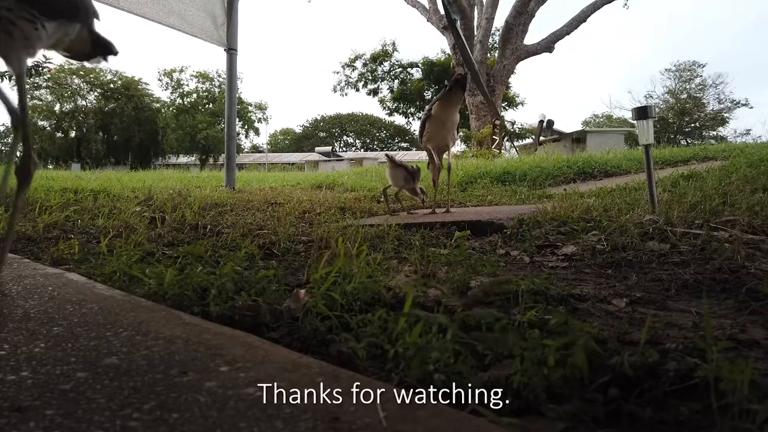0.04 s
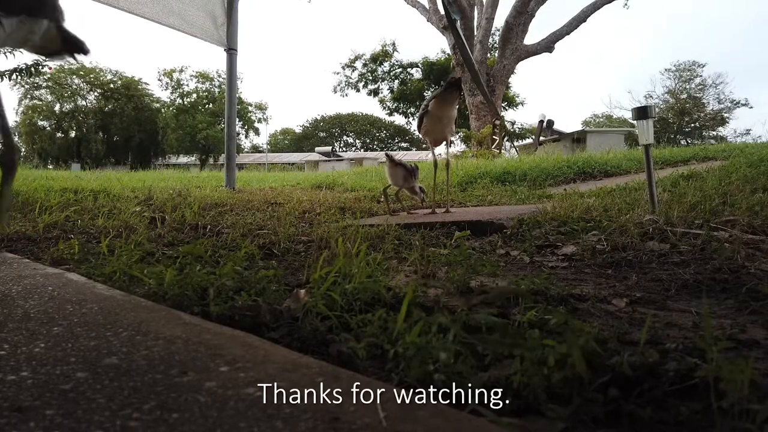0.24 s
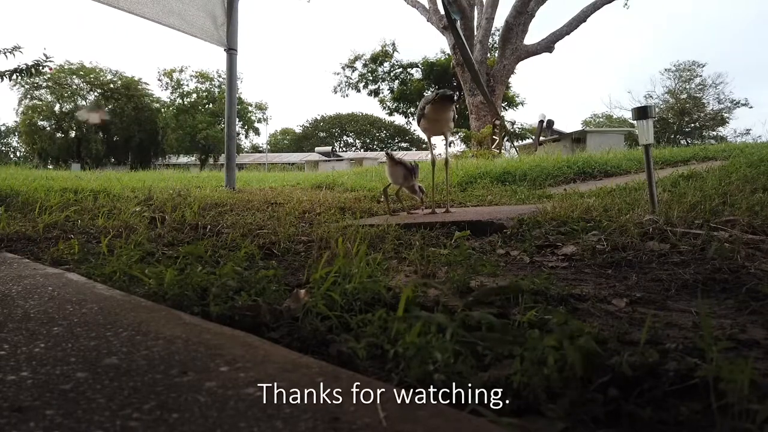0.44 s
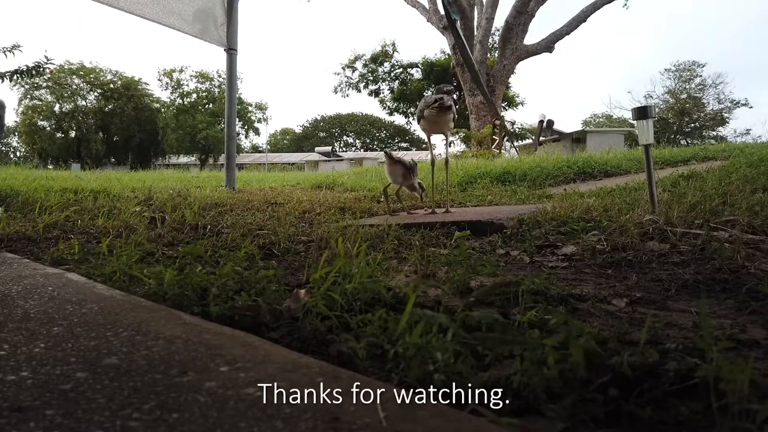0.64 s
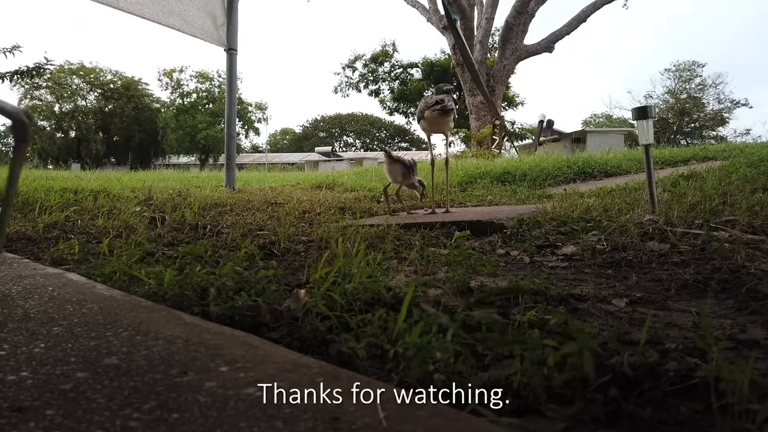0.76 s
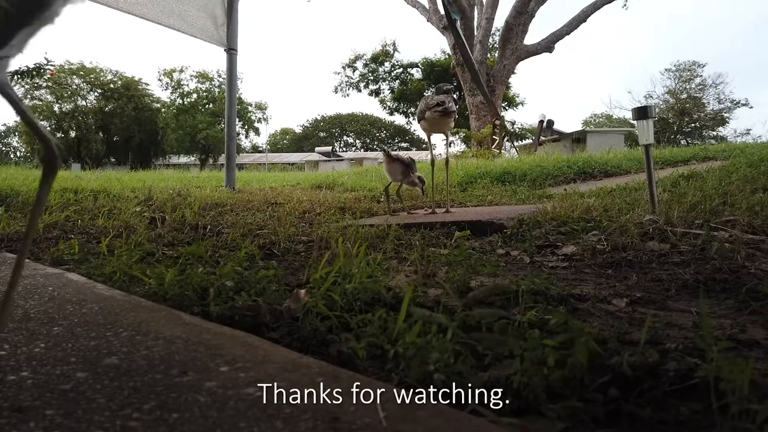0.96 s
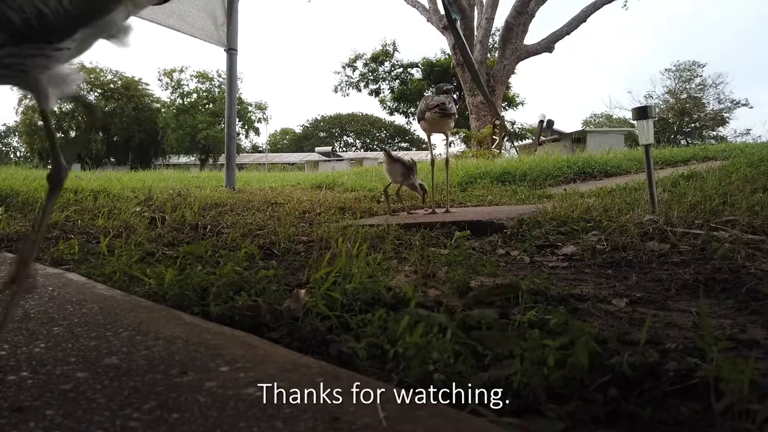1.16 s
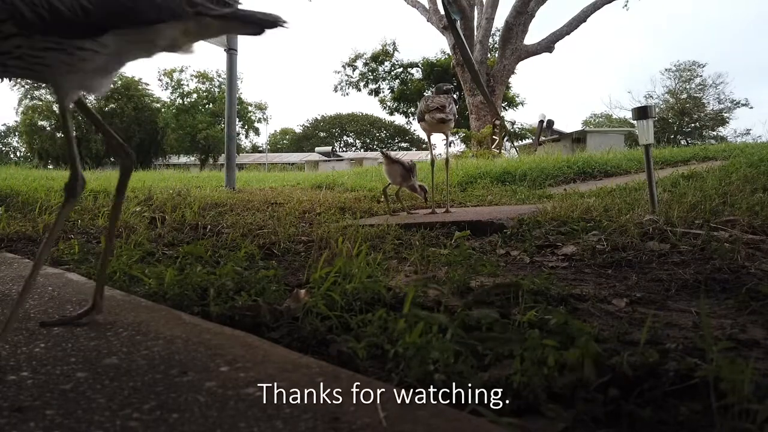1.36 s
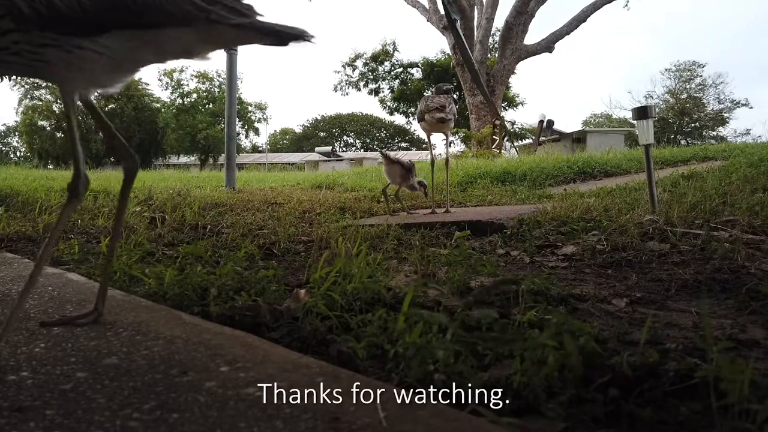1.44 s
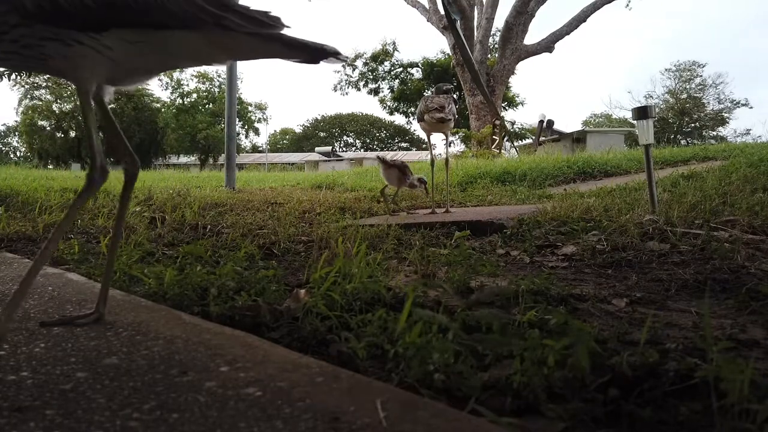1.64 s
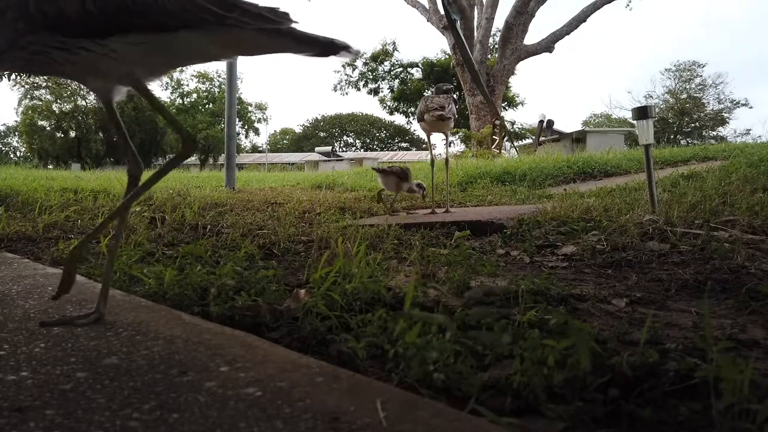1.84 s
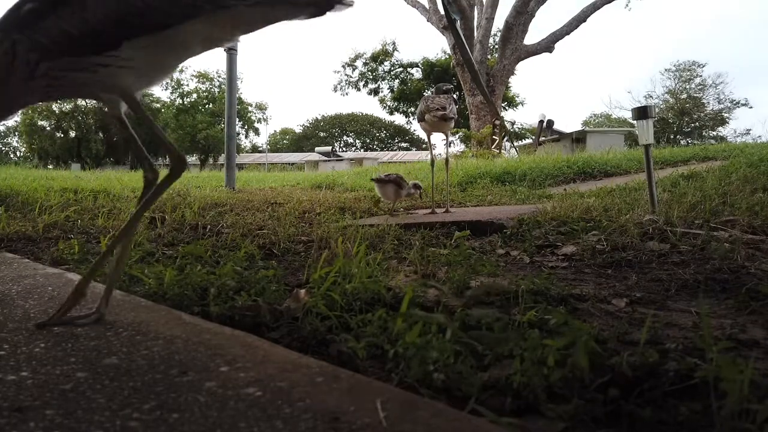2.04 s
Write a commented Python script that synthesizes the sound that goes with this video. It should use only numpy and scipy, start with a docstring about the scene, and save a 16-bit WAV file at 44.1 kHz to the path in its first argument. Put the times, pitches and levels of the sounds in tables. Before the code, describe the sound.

A large ground bird calls close by on an open lawn. A breathy hiss with a thin squeal dies away by 0.15 s; a rough croak clears into a short whistle at 0.3-0.43. Breeze rumble, soft microphone thumps, faint insects and distant whistles fill the gap. At 1.37 a chirp frays into a hiss, then a stuttering, harsh rasp from 1.65 peaks near 1.94 and fades, lightly echoing.

```python
"""Bush stone-curlews call close by on an open lawn. First a hiss of puffed air dies away, then a rough
croak clears into a whistle made of overtones. Later a chirp, a moving tone that grows unsteady, opens
a second hiss. Last comes a long rasp: uneven puffs with ringing voiced strands, after a stuttering start.
Throughout, noise makes the air and breeze, and a narrow noise band the faint insects; low swings
thump at the microphone and pure notes whistle far off. Trees and houses answer with delayed copies."""
import sys
import numpy as np
from scipy import signal
from scipy.fft import rfft, irfft, next_fast_len
from scipy.io import wavfile
from scipy.ndimage import map_coordinates

SR = 44100
rng = np.random.default_rng(int(sys.argv[2]) if len(sys.argv) > 2 else 0)


def wav_out(sig):
    """Save sig, one row per channel (or a flat mono array), as 16-bit PCM at SR to the path in sys.argv[1]."""
    wavfile.write(sys.argv[1], SR, np.round(np.clip(np.atleast_2d(sig).T, -1, 1) * 32767).astype(np.int16))


N = 92036  # length in samples


def amp(db):
    """Turns decibels into a gain."""
    return 10 ** (np.asarray(db) / 20)


def unit(x):
    """Scales a sound to an average (rms) strength of 1."""
    return x / np.sqrt(np.mean(x ** 2) + 1e-20)


def along(points, hz):
    """Reads a table of (pitch_hz, value) between its points, on a log pitch axis."""
    f, v = np.transpose(points)
    return np.interp(np.log(hz + 1), np.log(f + 1), v)


def curves(rows):
    """Gives one smooth-running curve for each table column after the time."""
    s, *cols = np.transpose(rows)
    return [np.interp(np.arange(N) / SR, s, c) for c in cols]


def during(rows):
    """True from the first row's time to the last row's."""
    t = np.arange(N) / SR
    return (t >= rows[0][0]) & (t <= rows[-1][0])


def wobble(rate):
    """A smooth random curve through so many random points a second."""
    return map_coordinates(rng.standard_normal(N // 8), [np.arange(N) * rate / SR], mode="wrap")


def filtered(x, response):
    """Reshapes a sound by a gain that depends on frequency."""
    m = next_fast_len(N + SR // 2)
    gain = response(np.fft.rfftfreq(m, 1 / SR))
    return irfft(rfft(x, m) * gain, m)[..., :N]


def spread(pair, alike):
    """Mixes two unrelated sounds into left and right with a given likeness, at rms 1."""
    def turn(hz):
        return np.arccos(np.clip(along(alike, hz), -1, 1)) / 2
    mid, side = filtered(pair, lambda hz: np.array([np.cos(turn(hz)), np.sin(turn(hz))]))
    return unit(np.array([mid + side, mid - side]))


def rush(colour, alike, gate=1):
    """Rushing air: stereo noise, shaped in time by the gate and then coloured."""
    noise = gate * rng.standard_normal((2, N))
    coloured = filtered(noise, lambda hz: amp(along(colour, hz)))
    return spread(coloured, alike)


def resonance(f, hz, width):
    """The response of something that rings at one pitch."""
    return 1j * f * width / (hz * hz - f * f + 1j * f * width)


def tone(hz, overtones):
    """Sine waves at whole multiples of a moving pitch."""
    phase = 2 * np.pi * np.cumsum(hz) / SR
    return np.sqrt(2) * sum(amp(db) * np.sin(round(k) * phase) for k, db in overtones)


# colour of the outdoor air: pitch_hz, relative_level_db
AIR_COLOUR = [(60, -36), (250, 1.5), (500, -5), (1000, -8), (2000, -14), (3200, -14), (5000, -21),
              (9500, -22), (11500, -28.5), (15000, -37)]
# how alike the air is at left and right: pitch_hz, likeness (1 = same)
AIR_LIKENESS = [(60, 0.23), (400, 1), (1650, 0.94), (4970, 0.65), (15000, 0.32)]
# the insects' loudness: time_s, level_db
INSECT_LEVELS = [(.45, -70), (.8, -64.5), (1.05, -76)]
AIR_DB, INSECT_HZ = -57, 10150


def surroundings():
    """Steady noise for the outdoor air and a thin, ringing noise band for insects."""
    db, = curves(INSECT_LEVELS)
    noise = rng.standard_normal((2, N))
    shrill = unit(filtered(noise, lambda f: resonance(f, INSECT_HZ, 1000) ** 2))
    air = amp(AIR_DB) * rush(AIR_COLOUR, AIR_LIKENESS)
    return air + amp(db + 1.3 * wobble(25.0)) * shrill


# how alike the low rumbles are at left and right: pitch_hz, likeness (1 = same)
BASS_LIKENESS = [(30, 0.22), (400, 0.54)]
# the breeze's loudness: time_s, level_db
BREEZE_LEVELS = [(0, -34.5), (.12, -36.5), (.3, -42.5), (.42, -44), (.59, -39), (.68, -48), (.85, -37),
                 (1.26, -38), (1.35, -44.5), (1.49, -43), (1.58, -36.5), (1.85, -44), (2.08, -36)]
# colour of the breeze: pitch_hz, relative_level_db
BREEZE_COLOUR = [(14, -8), (28, 3.5), (50, -1.5), (110, -5), (180, -14), (420, -34), (900, -58)]


def breeze(lumpy_db=2.5):
    """Moving air buffets the two microphone ports as lumpy, low noise."""
    db, = curves(BREEZE_LEVELS)
    lumps = amp(lumpy_db * wobble(30.31))
    return amp(db) * unit(lumps * rush(BREEZE_COLOUR, BASS_LIKENESS))


# soft thumps at the microphone: start_s, level_db, pitch_hz, decay_s
THUMPS = [(0.028, -31.5, 134.5, 0.042), (0.219, -28, 138.9, 0.042), (0.356, -21, 32.5, 0.029),
          (.485, -30.5, 184.7, 0.023), (0.585, -34.5, 129, 0.0083), (0.836, -23, 236, 0.015),
          (1.051, -31, 152.7, 0.018), (1.165, -37, 179.5, 0.1), (1.25, -30.5, 240, 0.023),
          (1.625, -29, 149, 0.02), (1.65, -28, 205.8, 0.023), (1.676, -35.5, 176, 0.028)]
# colour of their scuff: pitch_hz, relative_level_db
SCUFF_COLOUR = [(40, -12.5), (130, 6.5), (260, 1), (420, -14.5), (700, -25), (2000, -56)]
SCUFF_DB, SCUFF_PITCH_HZ = -3.5, 169  # thumps below this pitch scuff less
RISE_CYCLES = 0.4  # swings taken to reach full strength


def thumps():
    """Each thump is a few low swings that die away, with a dull scuff of noise."""
    t, out = np.arange(N) / SR, np.zeros((2, N))
    scuff = amp(SCUFF_DB) * rush(SCUFF_COLOUR, BASS_LIKENESS)
    turns = rng.normal(0, 1.1, (len(THUMPS), 2, 1))  # each side starts at its own point of the swing
    for (s, db, hz, decay), turn in zip(THUMPS, turns):
        age, rise = np.maximum(t - s, 0), RISE_CYCLES / hz
        swell = np.sin(np.pi / 2 * np.minimum(age / rise, 1)) ** 2
        fade = np.exp(-np.maximum(age - rise, 0) / decay)
        swing = 0.54 * np.sin(2 * np.pi * hz * age + turn)
        out += amp(db) * swell * fade * (swing + scuff * min(hz / SCUFF_PITCH_HZ, 1) ** 2)
    return out


# how long the tail rings: pitch_hz, time_to_fall_60_db_s
LAWN_FADE = [(1200, 0.14), (2500, 0.17), (5000, 0.6), (12000, 0.42)]
ECHO_DELAY_S = .025


def echo(x):
    """Trees and houses send back a thin, late tail: noise that fades at its own pace at each pitch."""
    hz, t, z = signal.stft(rng.standard_normal((2, N)), SR, nperseg=256)
    fade = amp(-60 * t / along(LAWN_FADE, hz)[:, None])
    tail = signal.istft(z * fade, SR, nperseg=256)[1][:, :N]
    tail = spread(tail, [(3000, 0.91), (7000, 0.6)]) / np.sqrt(N)
    late = np.pad(x, (int(abs(ECHO_DELAY_S) * SR), 0))
    return signal.fftconvolve(late[None], tail, axes=1)[:, :N]


# reflections from hard surfaces: delay_s, level_db
WALLS = [(.0074, -12), (.07, -26.5)]


def walls(x):
    """Hard surfaces return single delayed copies."""
    return filtered(x, lambda f: sum(amp(db) * np.exp(-2j * np.pi * f * s) for s, db in WALLS))


def near_walls(x, count=8, longest_s=.024):
    """The path, the awning and the house return a few weak early copies."""
    delays = rng.uniform(.1, 1, (count, 1, 1)) * longest_s
    delays = delays + rng.normal(0, .00005, (count, 2, 1))  # slightly different at each side
    return filtered(x, lambda f: np.exp(-2j * np.pi * f * delays).sum(0) / np.sqrt(count))


WAVER_RATE = 380  # random pitch points a second
# distant whistles: start_s, length_s, pitch_hz, glide_hz, level_db
FAR_WHISTLES = [(0.25, 0.045, 1590, -19.5, -63.5), (0.442, 0.049, 1652, -20, -55.5),
                (0.49, 0.053, 1615, -35, -63), (0.987, 0.045, 2640, 61, -59.5),
                (1.273, 0.13, 1616, -15, -60)]
# thin squeals in the near calls: start_s, length_s, pitch_hz, glide_hz, level_db
SQUEALS = [(0, .06, 2800, -24, -36), (1.725, 0.087, 4015, -26, -51), (1.85, .04, 6640, -28, -59)]


def whistles(rows, waver_hz):
    """Pure, gently gliding notes that swell and fade."""
    t, out = np.arange(N) / SR, np.zeros(N)
    for s, length, hz, glide, db in rows:
        progress = np.clip((t - s) / length, 0, 1)
        swell = np.abs(np.sin(np.pi * progress)) ** 0.76
        out += swell * tone(hz + glide * progress + waver_hz * wobble(WAVER_RATE), [(1, db)])
    return out


# the chirp that opens the second hiss: time_s, pitch_hz (of the lowest note, not sounded), level_db
CHIRP = [(1.368, 913, -64.5), (1.378, 963, -51), (1.384, 1031, -46.5), (1.396, 1067, -47.5),
         (1.41, 1041, -46.5), (1.5, 1017, -64)]
# its overtones: multiple_of_pitch, level_db
CHIRP_OVERTONES = [(2, 1.5), (3, -21), (4, -18.5)]
CHIRP_FRAYS_PER_S = 0.534  # growth of the pitch unsteadiness, as a share of the pitch


def chirp():
    """A thin note rises, sinks a little and grows ever less steady as it melts into the hiss."""
    hz, db = curves(CHIRP)
    age = during(CHIRP) * (np.arange(N) / SR - CHIRP[0][0])
    unsteady_hz = hz * (1 + CHIRP_FRAYS_PER_S * age * wobble(WAVER_RATE))
    return during(CHIRP) * amp(db) * tone(unsteady_hz, CHIRP_OVERTONES)


FLAPS_HZ, FLAP_SCATTER = 223.4, .2  # typical flap rate; unevenness of the gaps
PUFF_DECAY_S, PUFF_SIZE_DB = 0.0049, 2  # fade of a puff; spread of puff sizes


def flutter(leak):
    """The bird's voice organ flaps unevenly; each flap adds a short puff to the steady leak of air."""
    count = 1200
    chance = rng.standard_normal((count, 2))
    gaps = np.exp(FLAP_SCATTER * chance[:, 0])
    at = (np.cumsum(gaps) * SR / FLAPS_HZ).astype(int)
    flaps = np.bincount(at, amp(PUFF_SIZE_DB * chance[:, 1]), N)[:N]
    puffs = signal.lfilter([1], [1, -np.exp(-1 / (SR * PUFF_DECAY_S))], flaps)
    return leak + unit(puffs)


RASP_LEAK, HISS_LEAK = 0.84, 2.1  # steady air against puffs of rms 1
# how alike the throat's air is at left and right: pitch_hz, likeness (1 = same)
THROAT_LIKENESS = [(900, 1), (2200, 0.86), (4000, 0.35), (7000, 0.23), (14000, 0.78)]
# the short call: time_s, pitch_hz (of the lowest note), level_db, roughness (0-1)
CALL = [(.27, 520.1, -68, 0.73), (.312, 581.6, -47.5, 0.52), (.342, 592, -46, 0.52), (.353, 610, -36, 0.03),
        (.368, 630, -31, 0), (.379, 648.6, -29, 0.04), (.389, 712.4, -35.5, 0), (.402, 645, -38.5, 0),
        (.412, 700, -45.5, 0.06), (.43, 634, -60.5, 0)]
# overtones of its whistle: multiple_of_pitch, level_db
CALL_OVERTONES = [(2, -1.5), (3, -22.5), (4, -27.5), (7, -43), (9, -35)]
# colour of its croak: pitch_hz, relative_level_db
CROAK_COLOUR = [(350, -59.5), (560, -1.5), (1300, -4.5), (1700, -14), (3000, -31), (8000, -57)]
CROAK_DB, CALL_AIR_DB = 0.5, -27.5
LOW_NOTE_DB = 8.5  # before the roughness scales it


def short_call():
    """A rough croak clears into a slightly airy whistle, mainly on its second harmonic."""
    hz, db, rough = curves(CALL)
    rough = np.clip(rough, 0, 1)
    hz = hz * (1 + (0.011 + 0.0792 * rough) * wobble(420))  # rough voice has a less steady pitch
    voice = tone(hz, CALL_OVERTONES) + rough * tone(hz, [(1, LOW_NOTE_DB)])
    croak = amp(CROAK_DB) * rush(CROAK_COLOUR, THROAT_LIKENESS, flutter(RASP_LEAK))
    air_colour = [(1500, -23), (4000, 1), (5600, -3), (7000, -16)]
    air = amp(CALL_AIR_DB) * rush(air_colour, THROAT_LIKENESS)
    return during(CALL) * amp(db) * (np.sqrt(1 - rough) * voice + 2 * rough * croak + air)


def stretched(pair, scale):
    """Reads a sound faster or slower, which slides its resonances up or down."""
    return np.array([map_coordinates(c, [np.cumsum(scale)], order=5, mode="wrap") for c in pair])


def above_usual(effort):
    """How far the effort stands above its strong level (75th percentile), in dB."""
    db = curves(effort)[0]
    return db - np.percentile(db[during(effort)], 75)


TREBLE_HZ, BRIGHTENS = 3920, 0.2  # treble starts around here; its extra dB per dB of effort


def brightened(x, effort):
    """The treble swells more than the rest as the bird pushes harder."""
    treble = filtered(x, lambda f: f ** 8 / (f ** 8 + TREBLE_HZ ** 8))
    return x + treble * (amp(BRIGHTENS * np.maximum(above_usual(effort), -10)) - 1)


# effort in each hiss: time_s, level_db
FIRST_HISS = [(0, -26), (.015, -29), (.045, -30), (.062, -32.5), (.085, -42.5), (.11, -49.5), (.18, -65)]
SECOND_HISS = [(1.40, -62), (1.425, -48.5), (1.478, -41), (1.518, -43), (1.54, -37.5), (1.572, -35.5),
               (1.595, -41.5), (1.615, -47), (1.64, -51.5)]
# colour of the open throat in each: pitch_hz, relative_level_db
FIRST_THROAT = [(300, -60), (850, -31), (1240, -9), (1600, -11.5), (2350, -5), (2850, 0), (3350, -6.5),
                (4250, -11.5), (4700, -16.5), (5600, -16.5), (7800, -31.5), (9900, -15.5), (11800, -31)]
SECOND_THROAT = [(300, -23), (780, -20), (980, -3), (1650, -2.5), (2400, 0.5), (3150, -5), (3500, -5.5),
                 (4200, -12.5), (5400, -13), (7200, -34.5), (10500, -26), (12500, -49)]
SAG_PER_DB = .007  # share by which the resonances sink per dB of lost effort


def hiss(effort, throat):
    """Puffs of air pass the open throat, whose resonances sink as the effort fades."""
    db, = curves(effort)
    scale = 1 + SAG_PER_DB * np.maximum(above_usual(effort), -20)
    air = stretched(rush(throat, THROAT_LIKENESS, flutter(HISS_LEAK)), scale)
    return during(effort) * amp(db) * brightened(air, effort)


# effort in the rasp: time_s, level_db, resonance_scale (1 = as listed)
RASP = [(1.648, -44, 0.97), (1.702, -39, 0.97), (1.757, -35, 1.01), (1.801, -34, 1.044),
        (1.916, -32.5, 0.98), (1.942, -28.5, 0.96), (1.966, -34.5, 0.98), (1.986, -41, 1.03),
        (2.087, -51.5, 1.11)]
# colour of the throat in the rasp: pitch_hz, relative_level_db
RASP_THROAT = [(780, -31.5), (1080, -12.5), (1450, -20), (1900, -13.5), (2150, -3.5), (2650, -13.5),
               (3000, -12), (3350, -17), (3800, -19), (5200, -25), (7000, -36), (9500, -35.5), (12500, -63)]
# voiced strands that ring in it: pitch_hz (before resonance_scale), waver_hz, relative_level_db
RASP_RINGS = [(2142, 32, -2.5), (2473, 74.6, 0.5), (3300, 80, -8)]
STRAND_TOP_HZ = 4550  # the strands fade away above this pitch
RING_DB, RING_GROWS = -2.5, 0.78  # strands against air at middling effort; dB gained per dB of effort
BILL_OPENS_S, SHUT_RING_DB = 0.24, 10.5  # the strands stand out while the bill is still opening
STUTTER_HZ, STUTTER_S = 90.5, 0.038  # slow, separate flaps at the start


def rasp():
    """Puffed air and rough voiced strands start with a stutter; harder pushing brings out the strands."""
    db, scale = curves(RASP)
    puffs, age = flutter(RASP_LEAK), np.arange(N) / SR - RASP[0][0]
    strands = sum(tone(hz * scale + waver * wobble(WAVER_RATE), [(1, level)])
                  for hz, waver, level in RASP_RINGS)
    ring = filtered(unit(puffs * strands), lambda f: 1 / (1 + (f / STRAND_TOP_HZ) ** 6))
    shut = np.clip(1 - age / BILL_OPENS_S, 0, 1)
    push_db = db - np.median(db[during(RASP)])
    share = amp(RING_DB + SHUT_RING_DB * shut + RING_GROWS * push_db)
    air = stretched(rush(RASP_THROAT, THROAT_LIKENESS, puffs), scale)
    voice = (air + share * ring) / np.hypot(1, share)
    stutter = 1 - np.clip(1 - age / STUTTER_S, 0, 1) * np.cos(2 * np.pi * STUTTER_HZ * age)
    return during(RASP) * amp(db) * stutter * brightened(voice, RASP)


RIGHT_LEADS_S = .000018  # near calls reach the right side first
NEAR_WALLS_DB, ECHO_DB, FAR_ECHO_DB = -8.5, -14, -4


def scene():
    """Near birds just off centre, far birds, and the lawn around them."""
    hisses = hiss(FIRST_HISS, FIRST_THROAT) + hiss(SECOND_HISS, SECOND_THROAT)
    near = hisses + short_call() + chirp() + rasp() + whistles(SQUEALS, waver_hz=27.4)
    sides = np.array([[-1], [1]])
    direct = filtered(near, lambda f: np.exp(1j * np.pi * f * RIGHT_LEADS_S * sides))
    far = whistles(FAR_WHISTLES, waver_hz=3)
    centre = near.mean(0)
    early = walls(near) + amp(NEAR_WALLS_DB) * near_walls(centre)
    late = echo(amp(ECHO_DB) * centre + amp(FAR_ECHO_DB) * far)
    return direct + far + early + late + thumps() + breeze() + surroundings()


TOP_HZ = 15750


def record(dry):
    """The microphone's sound keeps nothing above its top frequency."""
    return filtered(dry, lambda hz: hz < TOP_HZ)


dry = scene()
out = record(dry)
wav_out(out)
```